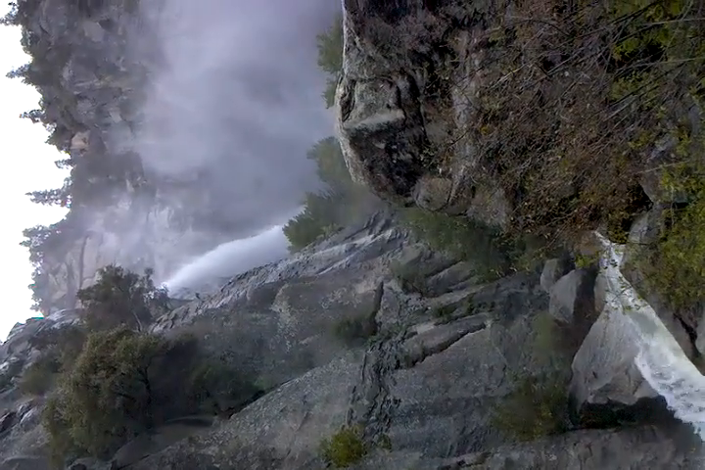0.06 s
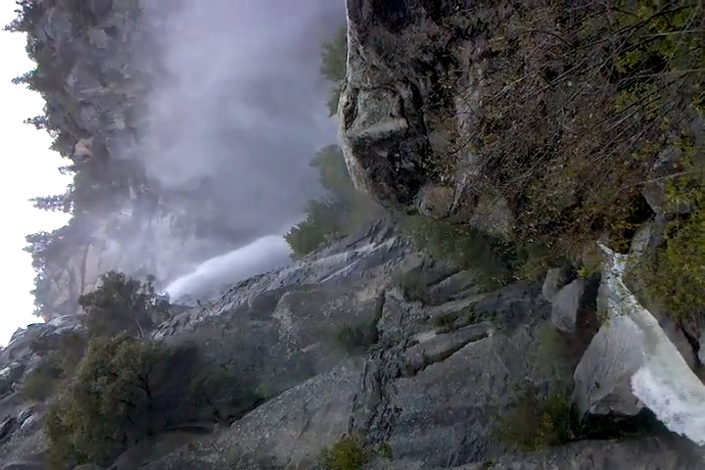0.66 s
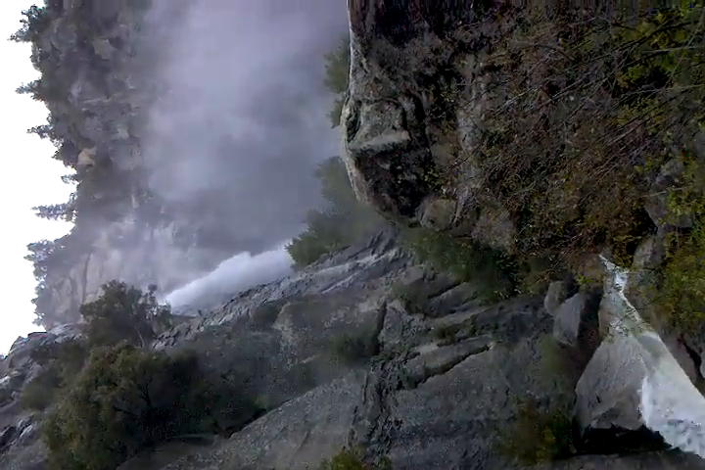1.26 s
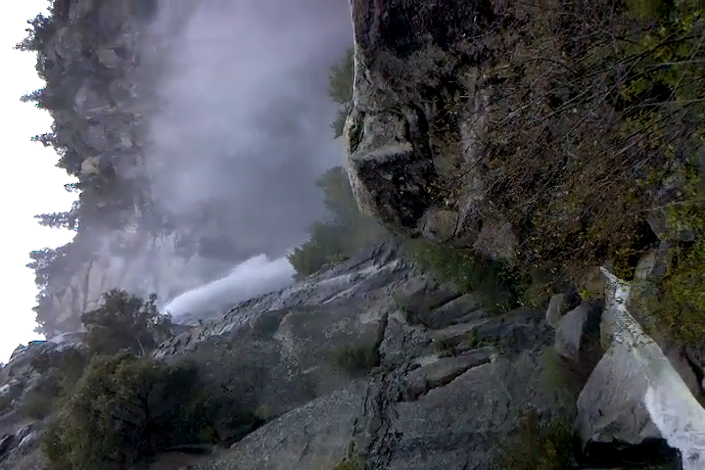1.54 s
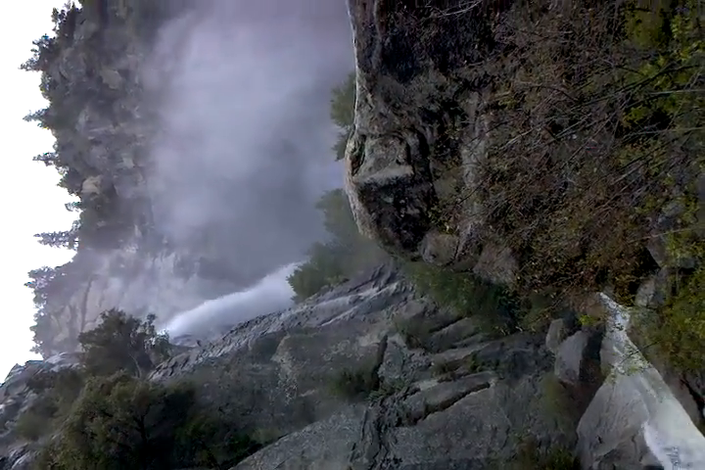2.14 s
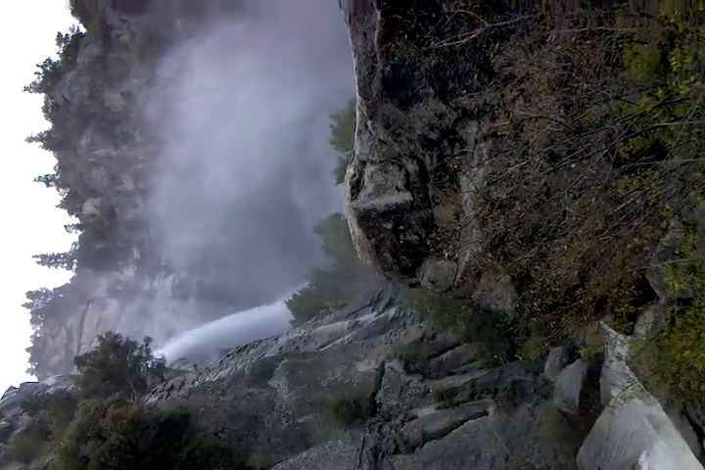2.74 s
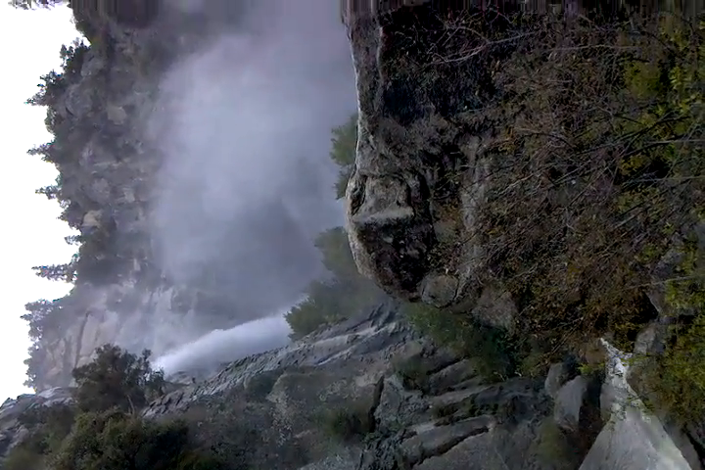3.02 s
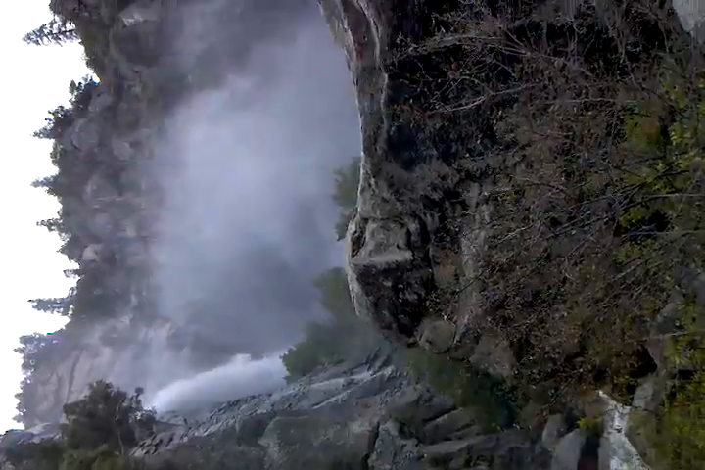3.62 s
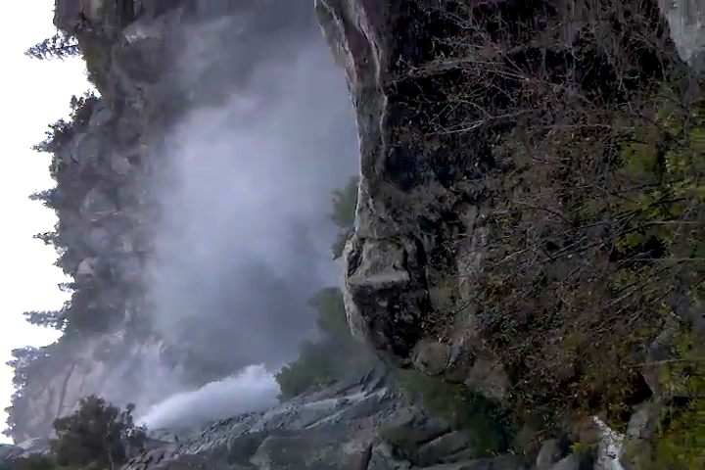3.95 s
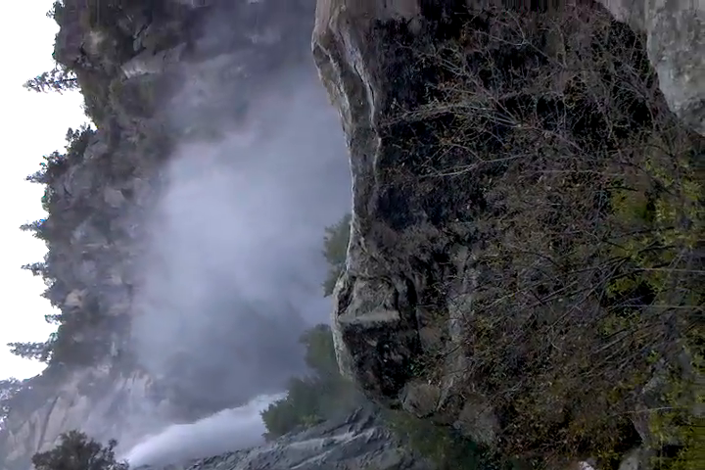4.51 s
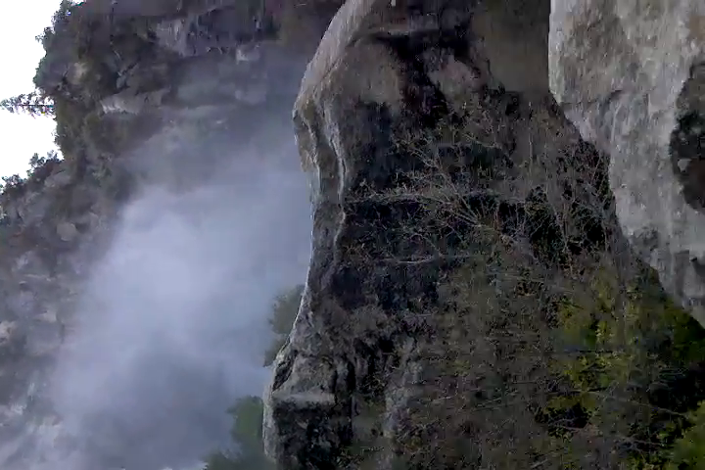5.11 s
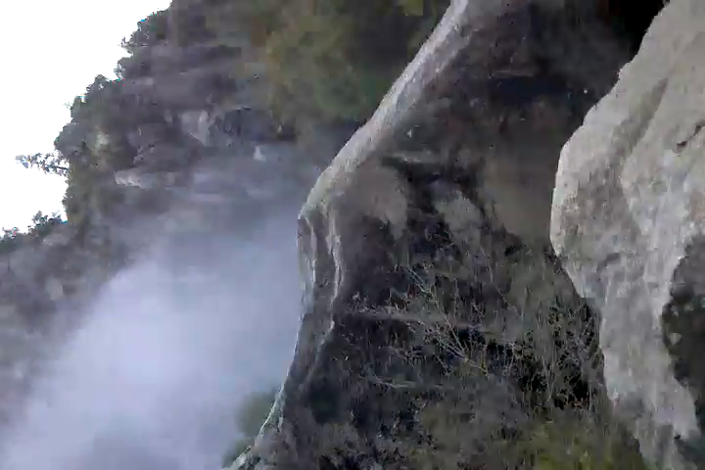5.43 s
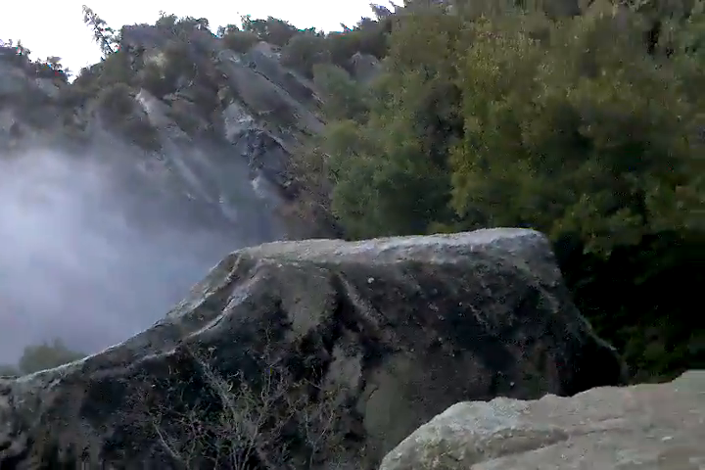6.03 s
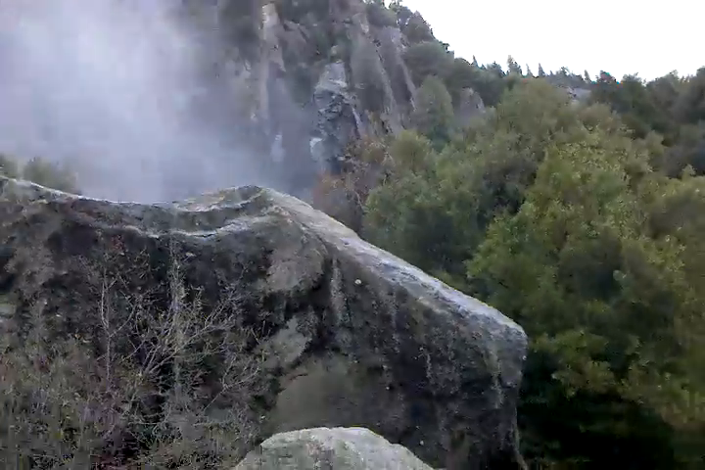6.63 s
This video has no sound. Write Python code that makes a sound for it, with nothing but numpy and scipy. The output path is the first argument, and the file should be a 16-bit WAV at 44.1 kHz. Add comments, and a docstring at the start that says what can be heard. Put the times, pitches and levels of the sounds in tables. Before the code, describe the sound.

Steady rush of a distant waterfall; late on, its tone shifts with slight handling noise, one tick and gentle gusts on the microphone.

```python
"""A large waterfall roars steadily in a rocky valley, heard from a distance on a hand-held camera's
microphone. Countless splashes merge into one rush. Near the end the camera is turned: the hand around
the microphone colours the rush, the grip rubs and ticks once, and soft gusts buffet the microphone."""
import sys
import numpy as np
from scipy import signal
from scipy.fft import rfft, irfft
from scipy.io import wavfile

SR = 44100
rng = np.random.default_rng(int(sys.argv[2]) if len(sys.argv) > 2 else 0)


def generate_wav(sig):
    """Save sig (samples, or channels by samples) to the path in sys.argv[1] as 16-bit PCM at SR."""
    pcm = np.round(np.clip(np.atleast_2d(sig).T, -1, 1) * 32767).astype(np.int16)
    wavfile.write(sys.argv[1], SR, pcm)


N = 302509
HOP = 256
TIME_S, FRAME_S = np.arange(N) / SR, np.arange(N // HOP + 6) * HOP / SR
ALL_HZ, BIN_HZ = np.fft.rfftfreq(N, 1 / SR), np.fft.rfftfreq(4 * HOP, 1 / SR)


def gain_of(db):
    """Decibels to amplitude."""
    return 10 ** (np.asarray(db) / 20)


def unit_rms(x):
    """Scales x to rms 1."""
    return x / np.sqrt(np.mean(x ** 2) + 1e-20)


def bell(x, centre, width):
    """A bump of height 1 and the given full width at half height."""
    return .5 ** ((2 * (x - centre) / width) ** 2)


def ease(t, middle_s, length_s):
    """A smooth move from 0 to 1."""
    return .5 + .5 * np.sin(np.pi * np.clip((t - middle_s) / length_s, -.5, .5))


def coloured(x, curve):
    """Filters x by (frequency_hz, level_db) points, joined over log frequency."""
    hz, db = np.transpose(curve)
    curve_db = np.interp(np.log(ALL_HZ + 1), np.log(hz + 1), db)
    return irfft(rfft(x) * gain_of(curve_db), N)


def shaped(x, db):
    """Gives x a changing colour, in dB over frames x bins."""
    spectra = signal.stft(x, nperseg=4 * HOP, noverlap=3 * HOP)[2]
    gain = gain_of(db[:spectra.shape[1]].T)
    return signal.istft(spectra * gain, nperseg=4 * HOP, noverlap=3 * HOP)[1][:N]


def drift(frames, bins):
    """Smooth random patches of the given size in time and frequency, rms 1."""
    noise = rng.standard_normal((len(FRAME_S) + frames - 1, len(BIN_HZ) + bins - 1))
    patch = np.outer(np.hanning(frames), np.hanning(bins))
    return unit_rms(signal.fftconvolve(noise, patch, "valid"))


# A finger on the case, next to the microphone: peak_s, length_s, centre_hz, width_hz, level_db
FINGER_SLIDE = (5.162, .055, 6000, 1700, -35.5)

def finger_rub():
    """Friction gives a brief, high hiss as a finger slides over the case."""
    peak_s, length_s, centre_hz, width_hz, level_db = FINGER_SLIDE
    friction = irfft(rfft(rng.standard_normal(N)) * bell(ALL_HZ, centre_hz, width_hz), N)
    return gain_of(level_db) * bell(TIME_S, peak_s, length_s / 2) * unit_rms(friction)


# Modes of the case that holds the microphone: pitch_hz, relative_db, t60_s
CASE_MODES = [(2300, -5, .0033), (4500, 1, .003)]

def case_tick(start_s=5.3073, peak_db=-11.5, contact_s=.0007):
    """The case gives one dry tick as the grip shifts; a soft contact keeps it inside its modes."""
    age = np.maximum(TIME_S - start_s, 0)
    push = np.minimum(age / contact_s, 1) ** 2
    ring = push * sum(gain_of(db - 60 * age / t60) * np.sin(2 * np.pi * hz * age)
                      for hz, db, t60 in CASE_MODES)
    return gain_of(peak_db) * ring / abs(ring).max()


# Gusts right on the microphone: peak_s, width_s, level_db
WIND_GUSTS = [(5.247, 0.19, -34), (5.5, 0.11, -32.5), (5.708, 0.17, -33), (6.57, .22, -27)]
# Spectrum of their rumble: frequency_hz, relative_db
RUMBLE_SPECTRUM = [(25, -49), (60, -27), (110, -2), (190, 3.5), (300, -5), (500, -12.5), (1200, -37.5),
                   (4000, -80)]

def wind():
    """Eddies at the microphone port rumble as each gust swells and dies."""
    swell = sum(gain_of(db) * bell(TIME_S, peak_s, width_s) for peak_s, width_s, db in WIND_GUSTS)
    rumble = coloured(rng.standard_normal(N), RUMBLE_SPECTRUM)
    return swell * unit_rms(rumble)


# Two resonances and a dip of the hand round the microphone: base_pitch_hz, width_hz, base_gain_db
HAND_RESONANCES = [(2230, 900, 7.8), (2980, 650, -3.8), (4080, 1200, 4.5)]

def cupped_hand(rush, shade_db=-3.4, bare_db=3.7, shadow_hz=5450):
    """The hollow of the hand rings lower and more as it closes; the case shades, then bares the treble."""
    t = FRAME_S[:, None]
    closed = ease(t, middle_s=5.06, length_s=.85)
    turning = bell(t, centre=5.87, width=.86)
    bared = ease(t, middle_s=6.4, length_s=.55)
    # in mid-turn the grip loosens: the resonances lose depth and pitch
    depth = 1.02 * closed * (1 - .48 * turning)
    tuning = 1.048 * (1 + .28 * (1 - closed) - .15 * turning)
    ring_db = sum(db * bell(BIN_HZ, hz * tuning, width) for hz, width, db in HAND_RESONANCES)
    treble_db = shade_db * turning + bare_db * bared
    # the shadow is deepest in one band and stays partly above it
    shadow = np.maximum(bell(BIN_HZ, shadow_hz, width=1300), .41 * (BIN_HZ > shadow_hz))
    return shaped(rush, depth * ring_db + treble_db * shadow)


# Spectrum of the fall, from a distance in the rocky valley: frequency_hz, relative_db
FALL_SPECTRUM = [(25, -58), (50, -31), (80, -15.5), (125, -5), (200, 0), (400, -3), (900, -6), (1600, -8.5),
                 (2100, -14), (2550, -16.5), (3700, -14), (5200, -17), (6800, -22), (12000, -33.5)]

def waterfall(level_db=-28, splashes_per_s=2500, splash_gain=.22, patchy_db=.5, surge_db=.12):
    """Far impacts blur into noise, nearer splashes add grain, and clumps of water surge in patches."""
    splashes = rng.standard_normal(N) * (rng.random(N) < splashes_per_s / SR)
    impacts = rng.standard_normal(N) + splash_gain * unit_rms(splashes)
    rush = gain_of(level_db) * unit_rms(coloured(impacts, FALL_SPECTRUM))
    clumps_db = patchy_db * drift(frames=30, bins=24) + surge_db * drift(frames=80, bins=400)
    return shaped(rush, clumps_db)


def scene():
    """The distant fall heard past the hand, with wind and handling at the microphone, in mono."""
    return (cupped_hand(waterfall()) + wind() + finger_rub() + case_tick())[None]


# Treble response of the recorder behind the microphone: frequency_hz, gain_db
TREBLE_RESPONSE = [(6800, 0), (7200, -10), (7600, -20.5), (8000, -31.5), (8600, -30.5), (9000, -36)]

def record(dry):
    """A narrow-band recorder: the treble rolls off, then ends at 9100 Hz."""
    dull = coloured(dry[0], TREBLE_RESPONSE)
    low_pass = signal.firwin(511, 9100, window=("kaiser", 9), fs=SR)
    return signal.oaconvolve(dull, low_pass, "same")[None]


dry = scene()
out = record(dry)
generate_wav(out)
```